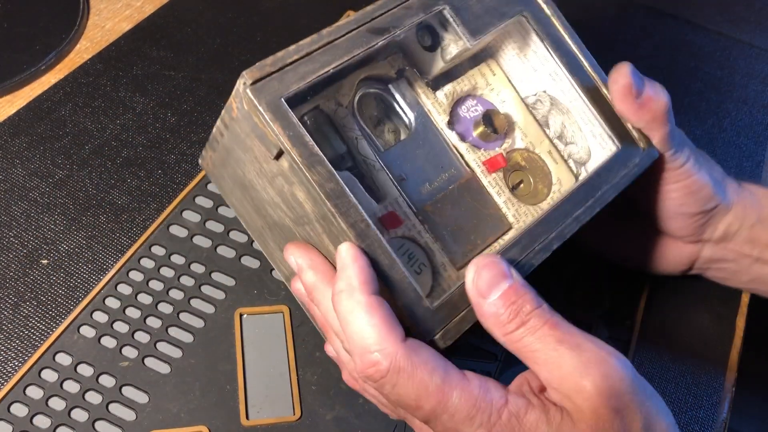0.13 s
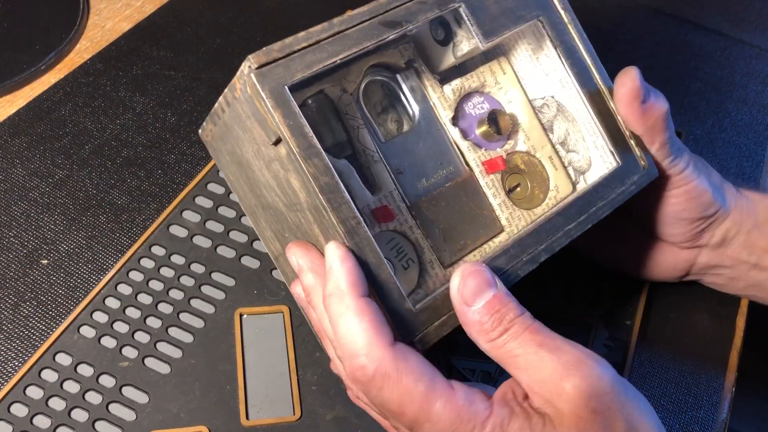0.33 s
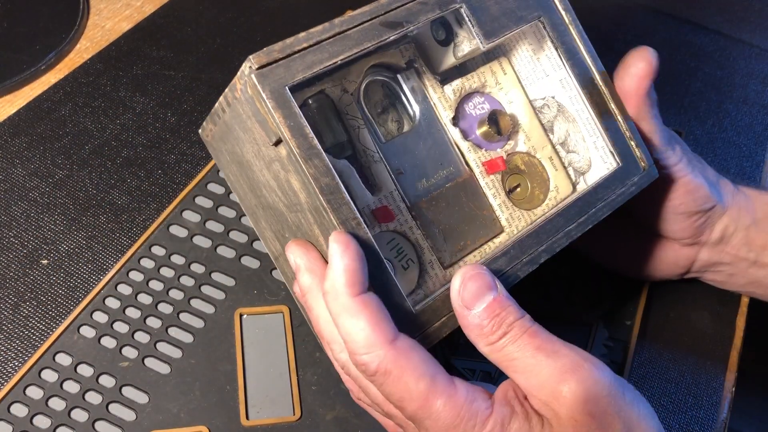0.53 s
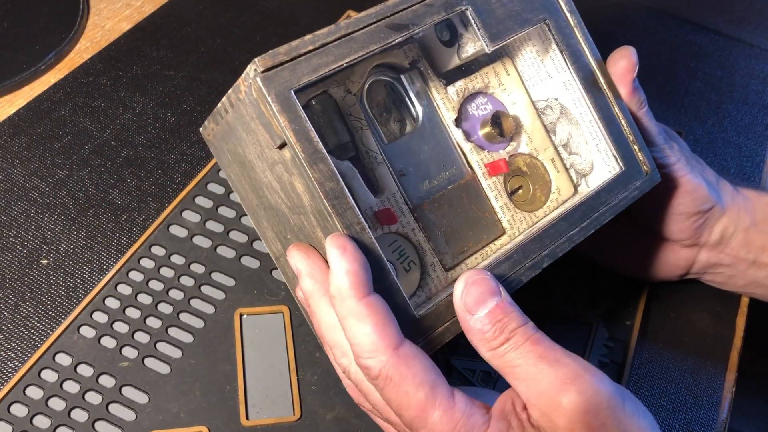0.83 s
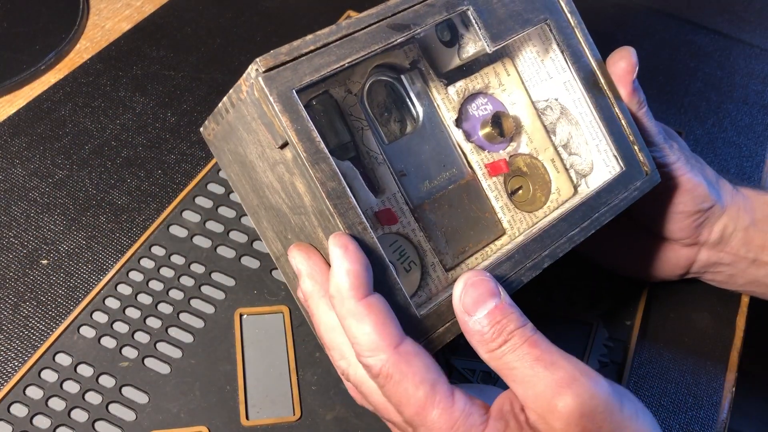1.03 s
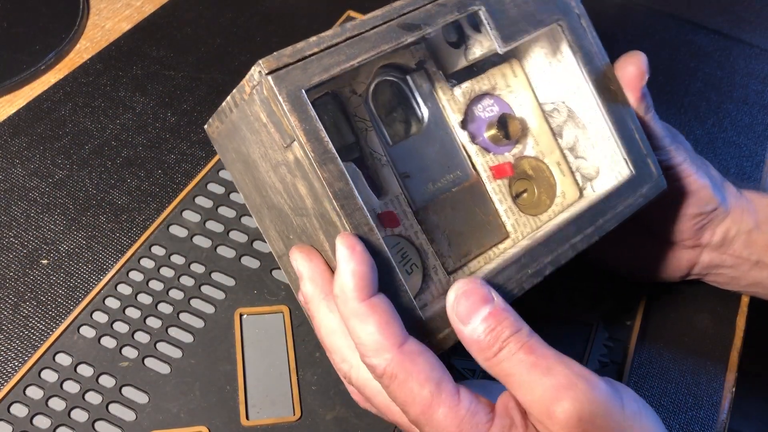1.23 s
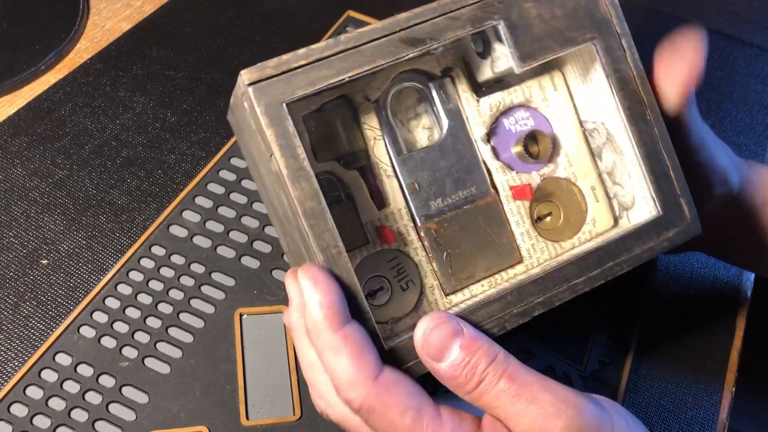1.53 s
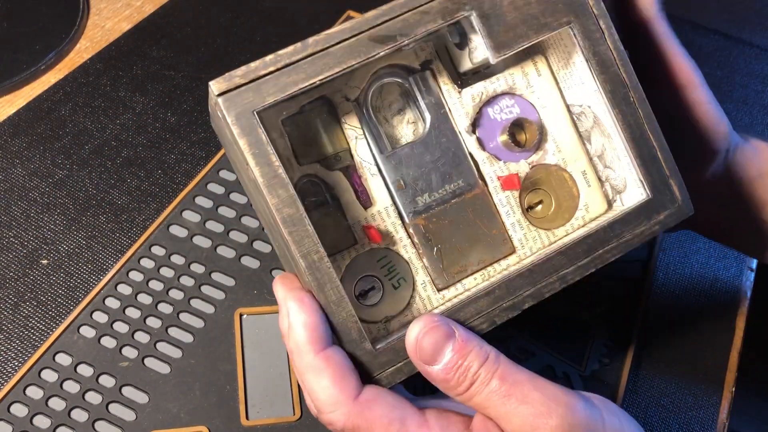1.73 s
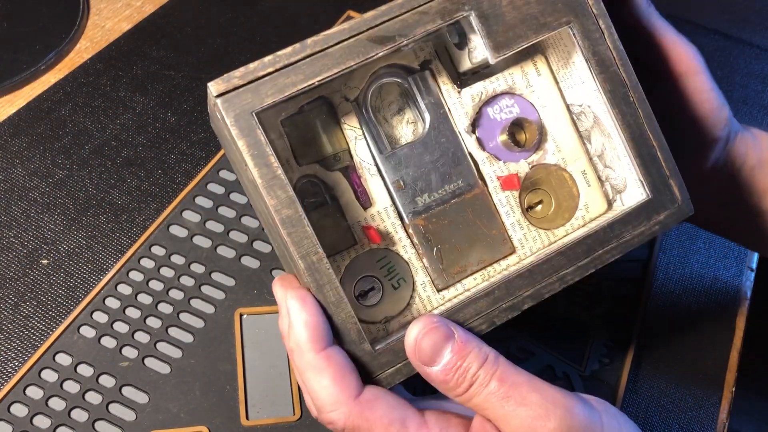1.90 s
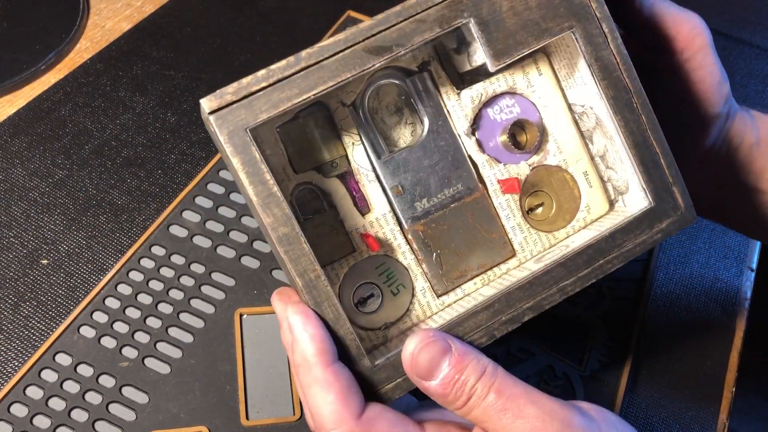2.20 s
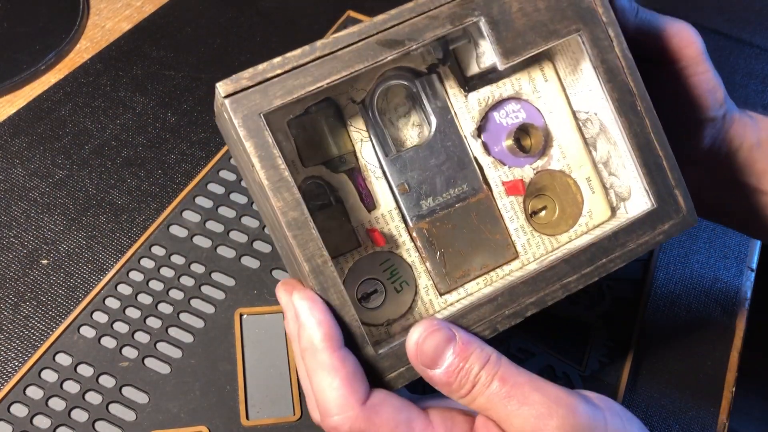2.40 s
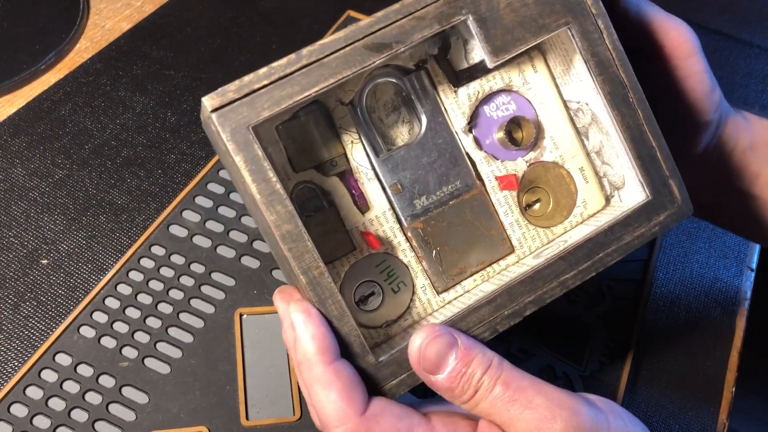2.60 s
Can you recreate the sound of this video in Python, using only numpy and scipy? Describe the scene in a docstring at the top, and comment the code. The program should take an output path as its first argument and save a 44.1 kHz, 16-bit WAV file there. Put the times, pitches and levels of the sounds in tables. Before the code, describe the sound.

Close up indoors, fingers rub faintly on a wooden box; its glass lid squeaks and knocks hard, light handling follows, then a bright clustered clack rings briefly, with a last woody knock over faint low background noise.

```python
"""Glass-lidded wooden box in the hands

A wooden box with a glass lid is turned in the hands, close to the microphone in a small room.
Skin brushes over the wood as filtered noise; the lid scrapes as rougher noise and squeaks as an unsteady tone
in its groove, knocks home and clicks sharply twice. Each blow runs through the panels as a bending wave,
treble first, and rings the box; dull sine thumps and a faint noise background lie underneath."""
import sys
import numpy as np
from scipy import signal
from scipy.fft import rfft, irfft
from scipy.io import wavfile

SR = 44100
rng = np.random.default_rng(int(sys.argv[2]) if len(sys.argv) > 2 else 0)


def to_wav(s):
    """Save 16-bit WAV."""
    ch = np.atleast_2d(s).T  # columns
    pcm = np.round(np.clip(ch, -1, 1) * 32767)  # PCM
    wavfile.write(sys.argv[1], SR, pcm.astype(np.int16))


N = 121275
SPAN = 2 ** 15  # length of every impulse response, in samples
T = np.arange(N) / SR  # scene time in seconds
AGE = np.arange(SPAN) / SR  # time since an impulse in seconds
HZ = np.maximum(np.arange(SPAN // 2 + 1) * SR / SPAN, 1)  # frequency axis, kept above zero


def knocks():
    """Each contact is a crack, a grainy burst and the modes of box and lid, spread by bending-wave travel."""
    # Blows on the box. Each row: start in seconds, level in dB, then bass, low-mid, upper-mid and treble tone in dB,
    # contact cut-off in Hz, travel time of a 1 kHz bending wave in seconds, relative ring of the lid in dB.
    blows = [(0.0318, -35, 6.5, 8.5, -14, -3, 990, .0015, -3),
             (0.1066, -24.5, 0.5, 1, -12, 12, 1600, .004, 4.5),
             (0.423, -51, 15, 17, -18, -4, 920, .003, -15), (0.556, -38.5, 6.5, 0, -8, 5, 1390, .003, -3),
             (0.731, -50.5, 10, 4, 3.5, 7, 2000, .003, -9),
             (0.958, -46, 4.5, 2.5, -14.5, -15, 1175, .003, -1),
             (1.2202, -2, -0.5, -0.5, -9, -2, 5900, 0.0017, -3.5),
             (1.403, -34.5, -13, 5.5, -37, 6, 1300, .003, -11),
             (1.863, -33, -13, -13, -18, -29, 4950, .002, -13), (1.909, -47, 0, 10, 1, -2, 2000, .002, -9),
             (1.985, -35, -25, -8, -4.5, -3, 1780, .003, -6),
             (2.201, -44.5, -4.5, 7.5, -30, -5.5, 1190, .003, -11),
             (2.276, -37, 6, 8, -2, -7, 3970, .003, -20),
             (2.2975, -24.5, 9, 15.5, -6, -11, 3000, 0.0012, -12.5),
             (2.3438, -2, 3.5, 2, 0, 1.5, 14000, .0035, -26),
             (2.3507, -9.5, 2, 3, -0.5, -3.5, 3570, 0.001577, -10),
             (2.3583, -10.5, -1, -3, 2.5, -6, 3990, 0.00152, -9),
             (2.545, -33.5, -17, 0, -10, -10, 1200, .003, -14),
             (2.569, -27, 2, -7.5, -6, -22, 2970, .003, -13),
             (2.5767, -6, -10.5, 2.5, -7, 1, 3390, 0.0038, 7.5)]
    # Ringing of the wooden box. Each row: frequency in Hz, relative level in dB, decay t60 in seconds.
    box_modes = [(226.5, -5, 0.054), (334, -1.5, 0.073), (381.6, -14.5, 0.059), (413, -11, 0.032),
                 (639, -13.5, 0.02), (799, -7.5, 0.041), (1182, -21.5, 0.23), (1296, -16.5, 0.033),
                 (1680, -12, 0.036), (2025, -28, .04), (3090, -26.5, 0.096)]
    # Ringing of the glass lid in its groove. Each row: frequency in Hz, relative level in dB, decay t60 in seconds.
    lid_modes = [(790, -9, 0.032), (1574, -1.5, 0.017), (2554, 7.5, 0.019)]
    # Tone of the instant crack. Each row: frequency in Hz, relative level in dB.
    crack_tone = [(25, -45), (60, -27), (130, -1.5), (210, 6), (330, -6), (420, 0.5), (520, 5.5), (640, -3),
                  (800, 1), (1700, 3.5), (3000, 3.5), (5500, -4.5), (9000, -2.5), (16000, 2.5)]
    # Tone of the grainy burst. Each row: frequency in Hz, relative level in dB.
    grain_tone = [(100, -27), (380, -11.5), (520, -28), (800, 3.5), (1400, 3.5), (3000, -2), (4400, -1.5),
                  (5400, -10.5), (7500, -2), (10000, -2.5), (12000, -12), (15000, -10)]
    modes_db, crack_db, grain_db = -19.5, 3.5, 11
    grain_t60_s, grain_bright_t60_s = 0.031, 0.016  # at 2.5 kHz and below, at 7 kHz and above
    mode_scatter_db = 1  # the place of contact changes how much each mode rings
    crack_spill_db = 5.5  # how strongly the crack reaches the room
    lid_spill_db = -11  # the glass faces the microphone, so less of its ring reaches the walls

    box = ring_modes(box_modes, modes_db)
    lid = rfft(ring_modes(lid_modes, modes_db).sum(axis=0))
    crack = amp(crack_db) * colour(crack_tone)
    grain_colour = amp(grain_db) * colour(grain_tone)
    out = np.zeros(N + SPAN)
    for at, db, bass, low_mid, upper_mid, treble, cutoff, travel, lid_db in blows:
        mode_gains = amp(mode_scatter_db * rng.standard_normal(len(box)))
        wood = rfft(mode_gains @ box)
        glass = amp(lid_db) * lid
        grain = rfft(dense_ring([2500, 7000], [grain_t60_s, grain_bright_t60_s])) * grain_colour
        direct = crack + grain + wood + glass
        spill = amp(crack_spill_db) * crack + wood + amp(lid_spill_db) * glass
        reflected = spill * (room() - 1)  # the room without its direct sound
        tone = colour([(100, -3.5), (210, bass), (380, low_mid), (900, 0.5), (2700, upper_mid), (8000, treble)])
        # Travel time falls with the root of frequency; the 2 makes it exact as a group delay.
        bending = late(2 * travel * np.sqrt(1000 / HZ))
        start = int(at * SR)
        out[start:start + SPAN] += amp(db) * irfft((direct + reflected) * tone * soften(cutoff) * bending)
    return out[:N]


def squeak():
    """Glass sticking and slipping locks into a short, unsteady tone just before it seats."""
    # Points along the squeak. Each row: time in seconds, pitch before jitter in Hz, relative level in dB.
    path = [(1.19, 2600, -62), (1.194, 2600, -42), (1.202, 2520, -46), (1.206, 2700, -28),
            (1.2125, 2640, -30), (1.2165, 2700, -21), (1.2195, 2850, -26), (1.222, 2850, -45)]
    pitch_jitter, flutter_db, octave_db = .07, 2.5, -24  # jitter as a share of the pitch
    trim_db, room_db = -0.5, -19

    at, hz, db = np.array(path).T
    pitch = np.interp(T, at, hz) * (1 + pitch_jitter * walk(1200))
    phase = 2 * np.pi * np.cumsum(pitch) / SR
    level = np.interp(T, at, amp(db + trim_db), left=0, right=0)
    level = level * amp(flutter_db * walk(700))
    tone = np.sin(phase) + amp(octave_db) * np.sin(2 * phase)
    return through(level * tone, room(room_db))


def scrapes():
    """The glass drags along its groove in many tiny, uneven slips."""
    # Drags of the lid. Each row: start, end, rise and fall in seconds, level in dB.
    drags = [(1.172, 1.222, .04, .004, -48), (1.207, 1.224, .013, .003, -33),
             (2.272, 2.325, .009, .02, -56), (2.29, 2.303, .007, .004, -44)]
    # Tone of the scraping. Each row: frequency in Hz, relative level in dB.
    scrape_tone = [(30, -31.5), (90, -19), (280, 2.5), (600, 9), (950, 10), (1700, 1), (2600, 4.5),
                   (5500, -1.5), (9000, -10.5), (15000, -19.5)]

    level = sum(stroke(start, end, rise, fall) * amp(db) for start, end, rise, fall, db in drags)
    grit = unit(through(friction(.5), colour(scrape_tone)))
    return through(level * grit, room())


def fingers():
    """Skin hisses over the wood grain and stirs the resonant hollow of the box."""
    # Brushing strokes. Each row: start, end, rise and fall in seconds, level in dB, rasp in dB, treble in dB,
    # relative level of the hollow body in dB.
    rubs = [(-.01, 0.126, .005, .01, -59.5, -4.5, -3.5, 2),
            (0.032, 0.053, 0.002, 0.0043, -62.5, 8, 1.5, 12.5),
            (0.13, 0.244, 0.0083, 0.035, -56.5, 1.5, 1.5, -2.5),
            (0.224, 0.429, 0.087, 0.03, -60.5, 1, -2, 7.5), (0.415, 0.433, .005, 0.0074, -63, 6.5, 10, -10),
            (0.473, .492, 0.0041, 0.0061, -67, 0, 6.5, 8.5), (0.487, 0.641, 0.012, .02, -65.5, 8.5, -3, -5),
            (0.645, 0.702, .005, 0.044, -71.5, -6, -8, 12), (.724, 0.761, .003, 0.012, -68.5, -5, 2, 15.5),
            (1.035, 1.176, 0.014, 0.068, -69, -8, -7, -23), (1.322, 1.465, 0.01, 0.025, -63, -1, 0.5, 0),
            (1.452, 1.601, 0.018, 0.045, -65, 5, 0.5, -6), (1.586, 1.686, 0.019, 0.019, -64, 0, 3, -8),
            (1.666, 1.762, 0.03, 0.013, -69.5, 14.5, 5, -11), (1.776, 1.865, .01, 0.036, -71, -8, -12, 2),
            (1.859, 1.881, 0.0058, 0.0052, -59.5, -14, -7.5, 4),
            (1.89, 2.16, 0.081, 0.085, -61, 0.5, 2, -27), (2.105, 2.27, 0.012, 0.045, -77.5, 2, -15, 6.5)]
    # Tone of skin on wood. Each row: frequency in Hz, relative level in dB.
    rub_tone = [(100, 0), (300, 2.5), (900, 1.5), (2000, -1.5), (2900, -0.5), (4200, -0.5), (5600, -1.5),
                (7500, 0), (11000, -4), (15500, -8)]
    roughness, patchy_db, rasp_hz = 0.39, .8, 4430
    hollow_hz, hollow_width_hz, hollow_db = 370, 65, -11.5

    slips = friction(roughness) * amp(patchy_db * walk(60))
    hiss = unit(through(slips, colour(rub_tone)))
    resonance = 1 / (1 + 1j * (HZ ** 2 - hollow_hz ** 2) / (HZ * hollow_width_hz))
    hollow = unit(through(slips, resonance))
    out = 0
    for start, end, rise, fall, db, rasp, treble, body in rubs:
        tone = colour([(rasp_hz * 0.68, 0), (rasp_hz, rasp), (rasp_hz * 1.04, treble / 2), (11000, treble)])
        skin = through(hiss, tone)
        out = out + stroke(start, end, rise, fall) * amp(db) * (skin + amp(body + hollow_db) * hollow)
    return through(out, room())


def thumps():
    """The whole box rocks briefly on the hands: each thump is a decaying sine."""
    # Dull thumps of the box settling against the palms.
    # Each row: start in seconds, frequency in Hz, level in dB, rise in seconds, decay t60 in seconds.
    settlings = [(.113, 176, -41, 0.0042, 0.087), (0.131, 135, -44, 0.016, 0.18),
                 (0.734, 230, -50, 0.0054, 0.066), (1.226, 210.5, -29.5, 0.0058, .11),
                 (2.354, 115, -33.5, 0.023, .13), (2.595, 120, -49, 0.009, 0.089)]
    out = 0
    for at, hz, db, rise, t60 in settlings:
        t = np.maximum(T - at, 0)
        envelope = np.minimum(t / rise, 1) * fade(t, t60)
        out = out + amp(db) * envelope * np.sin(2 * np.pi * hz * t)
    return out


def room(wet_db=0):
    """Response from one spot on the box: direct sound, two near echoes and a diffuse tail."""
    # Diffuse tail. Each row: frequency in Hz, relative level in dB, decay t60 in seconds.
    tail_bands = [(30, -14, .4), (60, 5, 0.14), (131, 1, 0.29), (270, -15.5, 0.34), (511, -8.5, 0.26),
                  (970, -6.5, 0.34), (1970, -3.5, 0.39), (3950, -9, 0.35), (7860, -6, 0.28),
                  (14900, -15, 0.16)]
    # Echoes from the desk and nearby things. Each row: delay in seconds, relative level in dB.
    near_echoes = [(.0042, -17), (0.0137, -15.5)]
    delay_s, build_s, echo_cutoff_hz = 0.0026, 0.0028, 4470

    hz, db, t60 = np.array(tail_bands).T
    tail = dense_ring(hz, t60) * np.clip((AGE - delay_s) / build_s, 0, 1)
    echoes = sum(amp(level) * late(lag) for lag, level in near_echoes) * soften(echo_cutoff_hz)
    return 1 + amp(wet_db) * (echoes + rfft(tail) * colour(np.c_[hz, db]))


def background():
    """Faint steady noise, weighted towards the bass."""
    # Tone of the background. Each row: frequency in Hz, relative level in dB.
    floor_tone = [(25, 6.5), (60, -1), (130, 4.5), (220, 1.5), (400, -5.5), (1000, -13), (3000, -21.5),
                  (8000, -25), (16000, -25)]
    return amp(-69.5) * unit(through(rng.standard_normal(N), colour(floor_tone)))


def amp(db):
    """Decibels to gain."""
    return 10 ** (np.asarray(db) / 20)


def unit(x):
    """Scale to a standard deviation of 1."""
    return x / np.std(x)


def through(x, response):
    """Filter by a complex frequency response."""
    return signal.fftconvolve(x, irfft(response))[:N]


def on_log(hz, points, values):
    """Straight lines on a log-frequency axis."""
    return np.interp(np.log(hz), np.log(points), values)


def colour(points):
    """Causal, minimum-phase response through (Hz, dB) points."""
    hz, db = np.array(points, float).T
    cepstrum = irfft(np.log(amp(on_log(HZ, hz, db))))
    cepstrum[1:] *= 2  # folding the cepstrum forward in time makes the filter causal
    return np.exp(rfft(cepstrum[:SPAN // 2], SPAN))


def soften(hz):
    """Two-pole low-pass response."""
    return 1 / (1 + 1j * np.sqrt(2) * HZ / hz - (HZ / hz) ** 2)


def late(seconds):
    """Response of a delay."""
    return np.exp(-2j * np.pi * HZ * seconds)


def fade(t, t60):
    """Exponential decay, down 60 dB after t60 seconds."""
    return np.exp(-np.log(1000) * t / t60)


def stroke(start, end, rise, fall):
    """Envelope that rises, holds and falls."""
    return np.clip(np.minimum((T - start) / rise, (end - T) / fall), 0, 1)


def walk(rate):
    """Random values, `rate` a second, joined by straight lines; spread near 1."""
    return np.interp(T * rate, np.arange(N // 8), rng.standard_normal(N // 8))


def friction(rough):
    """Countless tiny slips of uneven size."""
    slip_size = np.exp(rough * walk(SR / 16))
    return unit(rng.standard_normal(N) * slip_size)


def ring_modes(modes, gain_db):
    """One decaying cosine for each resonance."""
    return np.array([amp(db + gain_db) * np.cos(2 * np.pi * hz * AGE) * fade(AGE, t60)
                     for hz, db, t60 in modes])


def dense_ring(points, t60s):
    """Crowded resonances: noise of flat energy whose octaves die at their own rates."""
    noise = rfft(rng.standard_normal(SPAN))
    centres = 62.5 * 2 ** np.arange(9)
    out = 0
    for centre, share in zip(centres, np.eye(len(centres))):
        band = irfft(noise * np.interp(HZ, centres, share))  # neighbouring octaves crossfade
        decay = fade(AGE, on_log(centre, points, t60s))
        out = out + band * decay / np.linalg.norm(decay)
    return out


def scene():
    """Box, hands and lid in the room, over a faint background."""
    return (knocks() + squeak() + scrapes() + fingers() + thumps() + background())[None]


def record(dry):
    """The recorder thins the deep bass and cuts the top."""
    low_cut_hz, top_hz = 52.5, 16100
    thin = signal.sosfilt(signal.butter(2, low_cut_hz, "high", fs=SR, output="sos"), dry)
    return signal.sosfilt(signal.ellip(10, .2, 80, top_hz, fs=SR, output="sos"), thin)


dry = scene()
out = record(dry)
to_wav(out)
```